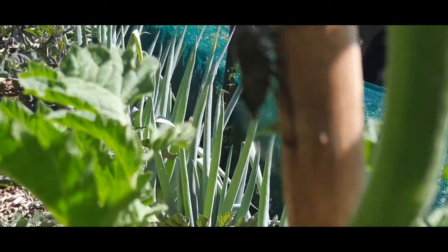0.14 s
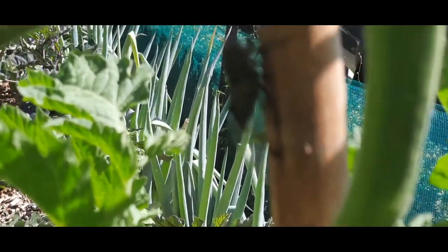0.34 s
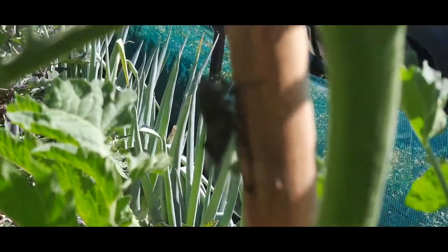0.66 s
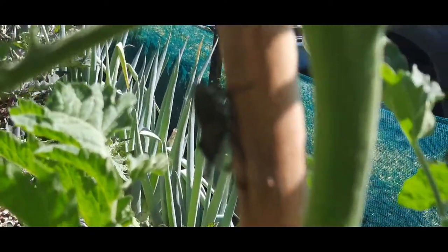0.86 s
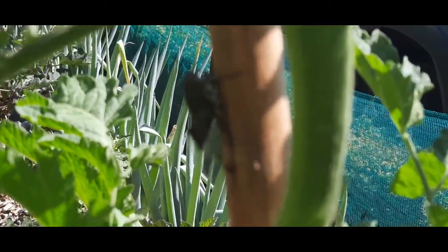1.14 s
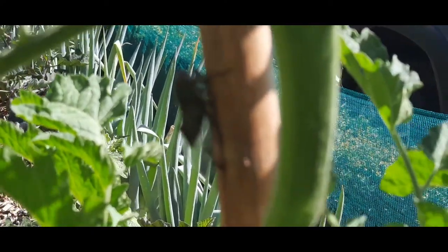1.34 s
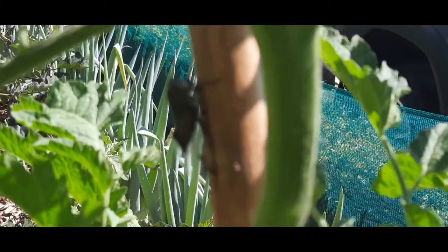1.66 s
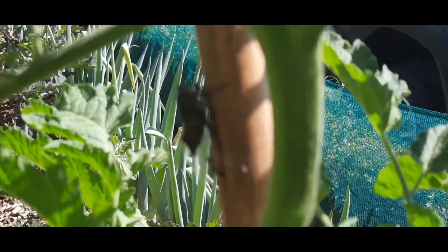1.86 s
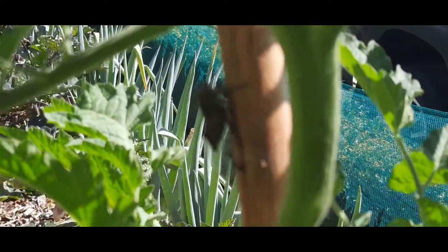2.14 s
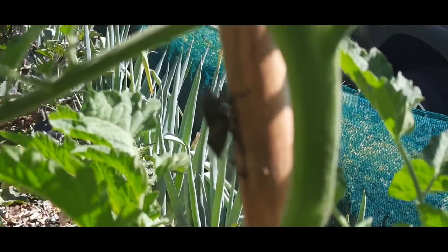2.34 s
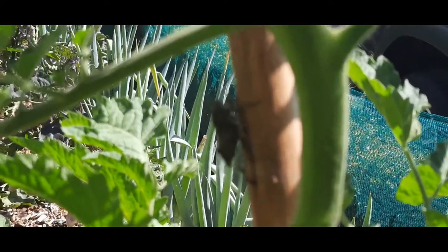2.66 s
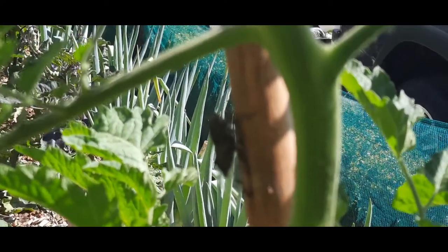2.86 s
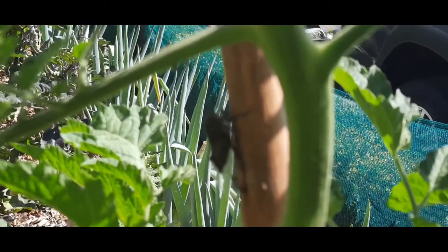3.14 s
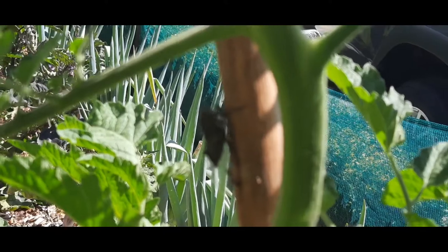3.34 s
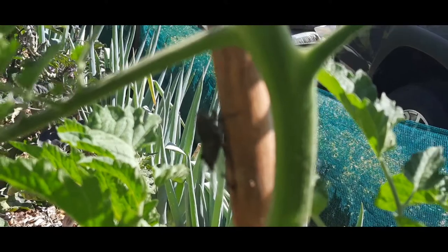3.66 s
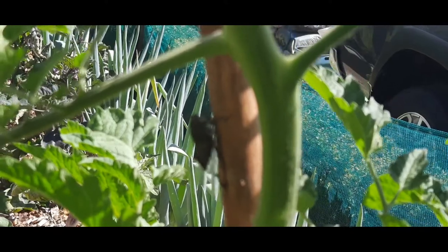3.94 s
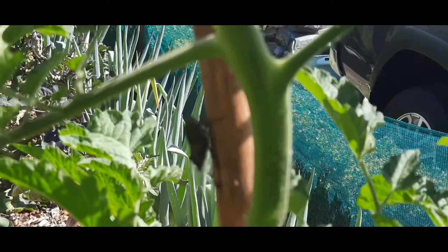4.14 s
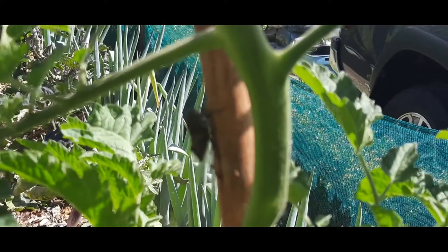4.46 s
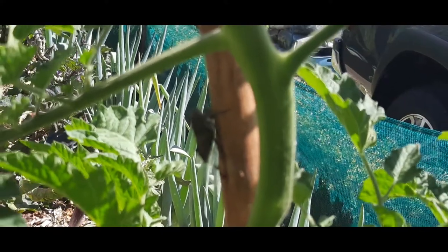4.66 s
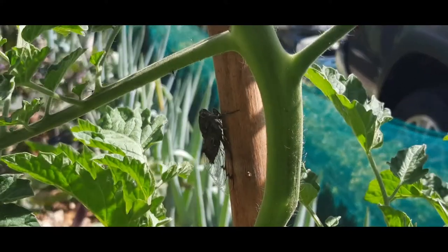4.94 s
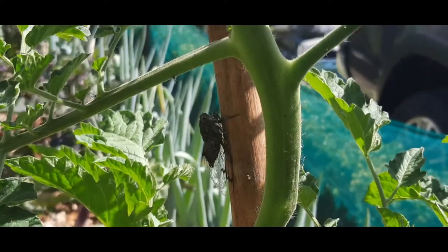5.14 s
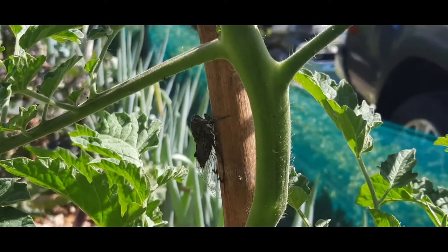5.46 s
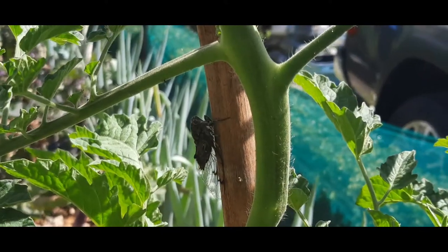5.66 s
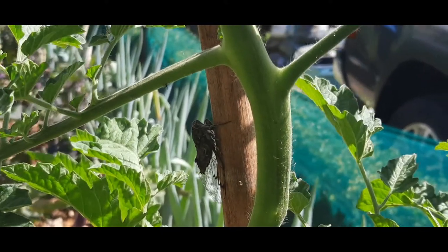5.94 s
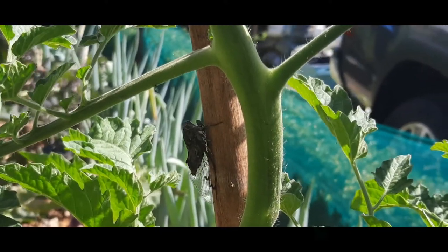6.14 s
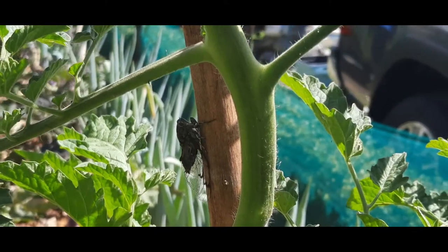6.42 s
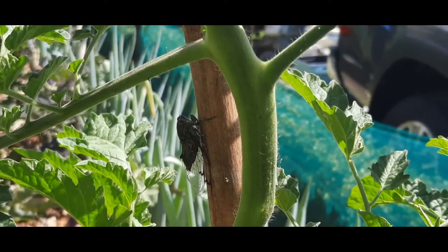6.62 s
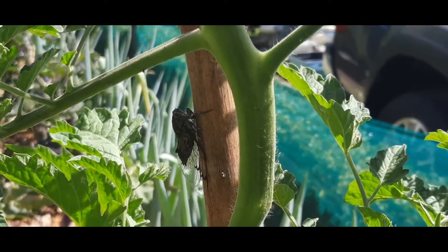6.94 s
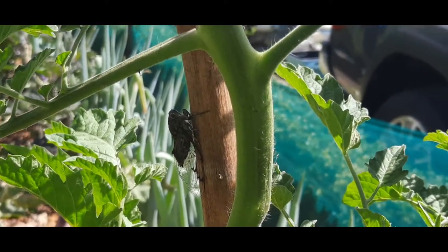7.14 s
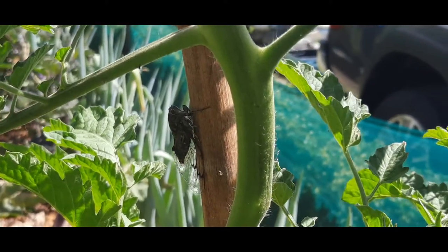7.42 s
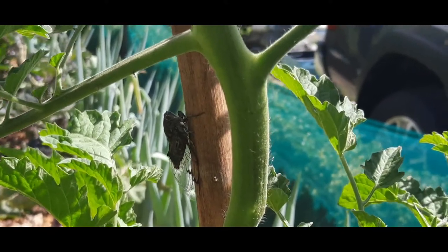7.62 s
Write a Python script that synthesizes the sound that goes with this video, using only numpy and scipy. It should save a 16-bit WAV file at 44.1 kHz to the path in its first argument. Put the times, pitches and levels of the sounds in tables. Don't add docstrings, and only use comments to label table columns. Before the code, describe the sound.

A cicada clinging to a garden stake is already singing, very near a handheld stereo microphone. From 0 to about 2 seconds it gives a coarse, pulsing rattle, some eighteen chirps a second, each a tiny burst of sharp clicks ringing bright and metallic around six to eight kilohertz. It swells early and stays strong, with a low fluttering push underneath. At about 2.1 it tightens into a quicker, finer buzz, around fifty pulses a second, quieter and slightly uneven, thinning until 4.5. The heavy throb then returns, loud and close, until 6.4, when a second fast buzz takes over, wavering and softening until the cut at 7.8. Leaves and ground add only a short, diffuse scatter. Faint garden air lies far below. Soft, low handling knocks come near 7.3, 7.6 and, barely, just before the end.

```python
import sys
import numpy as np
from scipy import signal
from scipy.fft import rfft, irfft
from scipy.io import wavfile

SR = 44100
rng = np.random.default_rng(int(sys.argv[2]) if len(sys.argv) > 2 else 0)


def wrap_up_sound(samples):
    columns = np.atleast_2d(samples).T
    tamed = np.clip(columns, -1, 1)
    steps = np.round(tamed * 32767).astype(np.int16)
    wavfile.write(sys.argv[1], SR, steps)


def gain_from_db(level_db):
    decades = np.asarray(level_db, float) / 20
    return 10 ** decades


N = 343539

# [t/ms in a long chirp, t/ms in a short chirp, left level/dB, right level/dB]
BUCKLES = [(1.05, .8, 0.5, -2), (2.15, 2.1, -3, -1.5), (4.05, 3.65, -1.5, -3), (5.1, 5.0, 0, -1.5),
           (7.2, 7.05, -3.5, -6)]
DIP_SHARES = [0.96, 0.17, 0.27, 0.25, 0.24]
# [t/ms, level/dB]
CONTRACTIONS = [(0, 0), (8.15, -1.5), (15.9, -3.5)]
# [t/s, chirps, gap change/ms, level/dB]
THROBS = [
    [(.011, 5, 0, -16.2), (.2974, 2, 0, -15.1), (.4155, 6, 0, -14.4), (.7631, 3, 0, -15),
     (.934, 6, .5, -15.5), (1.2798, 6, 0, -16), (1.6209, 3, -2.5, -16.6), (1.7909, 4, 0, -17),
     (2.0177, 1, 0, -17.4)],
    [(4.5005, 8, 1.7, -18.9), (4.9397, 4, 0, -15.6), (5.1647, 5, .8, -16), (5.4519, 7, 0, -16.2),
     (5.8512, 2, 0, -16.7), (5.9668, 7, 0, -16.4), (6.3642, 1, 0, -16.8)],
]
# [t/s, chirps, gap change/ms, level/dB]
FIRST_BUZZ = [(2.0729, 1, 0, -17.2), (2.1178, 5, -3, -19), (2.2624, 4, -5, -19.5), (2.3376, 3, 5, -19.8),
              (2.4104, 7, 0, -18.9), (2.5765, 6, -8, -18.8), (2.6681, 9, -2, -19.4), (2.7637, 3, 2, -18.6),
              (2.7992, 6, -6, -19.1), (2.9558, 4, 2.5, -19.7), (3.038, 25, 0, -19.3), (3.5193, 3, 3, -18.9),
              (3.5834, 21, 0, -19.5), (4.0071, 2, 0, -19), (4.0415, 10, .7, -18.8), (4.239, 10, 1.2, -18.7),
              (4.4528, 1, 0, -18.2), (4.4693, 1, 0, -19.2)]
SECOND_BUZZ = [(6.4198, 1, 0, -17.2), (6.4356, 3, 5, -18), (6.5143, 4, -1.5, -17.4), (6.6247, 5, 0, -17.6),
               (6.74, 6, -8, -17.6), (6.8225, 13, 0, -17.2), (6.9405, 9, 2.3, -18.2), (7.0343, 1, 0, -18.8),
               (7.0488, 4, 2.4, -18.8), (7.156, 8, -10, -20), (7.3079, 3, -1.5, -21),
               (7.3457, 14, -1.6, -21), (7.4966, 11, .6, -19.7), (7.6118, 9, 7, -20),
               (7.7383, 2, -3.5, -21), (7.782, 1, 0, -20)]


def click_times():
    rows = []
    for phrase in THROBS:
        for s, db in chirps(phrase, waver=.004):
            for gap_ms, fade_db in CONTRACTIONS:
                level_db = db + fade_db
                for (ms, _, left, right), share in zip(BUCKLES, DIP_SHARES):
                    dip_size = share * gain_from_db(2 * level_db)
                    rows.append((s + (gap_ms + ms) / 1000, level_db + left, level_db + right, dip_size, 8.5))
    for phrase in (FIRST_BUZZ, SECOND_BUZZ):
        for s, db in chirps(phrase, waver=.025):
            for (_, ms, left, right), share in zip(BUCKLES, DIP_SHARES):
                rows.append((s + ms / 1000, db + left, db + right, share * gain_from_db(2 * db), 0))
    return np.transpose(rows)


def chirps(runs, waver):
    start, count, change_ms, db = np.transpose(runs)
    s = [start[-1]]
    for a, b, n, change in zip(start, start[1:], count.astype(int), change_ms):
        gaps = (b - a) / n + change / 1000 * np.linspace(-.5, .5, n)
        s += list(a + np.cumsum(gaps) - gaps)
    s = np.sort(s)
    chance = rng.standard_normal((len(s), 2))
    wavering_s = s + waver * np.gradient(s) * chance[:, 0]
    effort_db = np.interp(s, start, db) + .4 * chance[:, 1]
    return np.transpose([wavering_s, effort_db])


# [f/Hz, width/Hz, level/dB]
BODY = [(5533, 1270, -10.5), (6053, 640, -5), (7120, 653, 2), (8325, 905, -0.5), (10224, 197, -6),
        (11080, 1090, -11), (14030, 1200, -27.5)]


def tymbals(clicks, jitter_ms, uneven_db, colour_db):
    s, *level_db = clicks[:3]
    s = s + jitter_ms / 1000 * rng.standard_normal(len(s))
    modes = len(BODY)
    strength = rng.standard_normal(len(s))
    shared, opposed = rng.standard_normal((2, modes, len(s)))
    near_db, lift_db, pan_db, _ = stance(s)
    high_db = -10.5 - 0.98 * near_db
    lag_ms = .119 + .003 * pan_db
    out = np.zeros((2, N))
    for k, (hz, width, db) in enumerate(BODY):
        posture_db, scatter_ms = 0, 0
        if hz < 6450:
            posture_db = lift_db + 11.5
        elif hz > 9300:
            posture_db = high_db + 10.0
            scatter_ms = 0.027 * opposed[k]
        for c, side in enumerate((1, -1)):
            own_db = uneven_db * strength + colour_db * (shared[k] + 1.48 * opposed[k] * side)
            place_db = near_db + side * (pan_db - .8) / 2
            size = gain_from_db(level_db[c] + db + posture_db + place_db + own_db + 29.5)
            strikes = impulses(s + c * (lag_ms + scatter_ms) / 1000, size)
            out[c] += (-1) ** k * resonance(strikes + 1e-18, hz, width)
    return butter(out, "high", 4950, order=10)


# [t/s, nearness level/dB, abdomen lift/dB, left-right level/dB, low dip level/dB]
STANCE = [(0, -2, -12.5, -2.5, -0.5), (.35, -0.45, -10.5, -1.9, -3), (.8, .5, -8, 0, -3.5),
          (1.5, 1, -8.5, -0.2, -2.5), (2.0, -0.3, -7, -0.4, 4), (2.5, -2.3, -6.5, 0, 2),
          (2.8, -3, -3.5, -1.2, 1), (3.0, -3.5, -2, -2.3, -12), (3.6, -3.5, -2, 0, -17),
          (4.2, -3, -3.5, 1.4, -12), (4.6, -2.06, -1, 0.3, -9), (5.0, 0.23, -5.5, -1.6, -0.5),
          (5.5, 0.35, -6.5, -2.5, 0), (6.35, 0, -6.5, -0.5, 2), (6.9, -1.1, -8, 1.6, 6),
          (7.2, -1.5, -3, .9, 5), (7.5, -1, -6, 2, 4.5), (7.79, -2, -1.5, 2, -6)]


def stance(s):
    at, *columns = np.transpose(STANCE)
    return [np.interp(s, at, c) for c in columns]


def foliage(x, near_db, near_t60, far_db, far_t60, dull_hz, count):
    t = np.arange(round(.12 * SR)) / SR
    onset = np.clip(t / .0005, 0, 1)
    near = onset * gain_from_db(np.array(near_db)[:, None] - 60 * t / near_t60)
    far = onset * gain_from_db(far_db - 60 * t / far_t60)
    place = np.arange(N) / N * (count - 1)
    treble_gain = gain_from_db(np.array([[8.5], [6.0]]))
    out = np.zeros((2, N))
    for k in range(count):
        weight = np.cos(np.pi / 2 * np.clip(place - k, -1, 1))
        leaves, ground = rng.standard_normal((2, 2, len(t)))
        leaves = leaves + treble_gain * butter(leaves, "high", 10100, order=4)
        echoes = near * leaves + far * butter(ground, "low", dull_hz, order=1)
        out += signal.oaconvolve(x * weight, echoes, axes=1)[:, :N]
    return out


def low_dips(clicks):
    s, _, _, size, extra_db = clicks
    dip_db = stance(s)[3]
    dip = butter(impulses(s, size * gain_from_db(dip_db + extra_db + 30.5)) + 1e-18, "low", 498, order=2)
    ring = resonance(impulses(s, size * gain_from_db(leak_db(s) + 48.5)) + 1e-18, 321, 51)
    left = dip + butter(ring, "low", 590, order=2)
    right = gain_from_db(-28.0) * butter(left, "high", 200, order=1)
    return -butter(np.array([left, right]), "high", 81, order=3)


def leak_db(s):
    start_db, end_db, settle_s = -3, -11.5, 1.28
    return end_db + (start_db - end_db) * np.exp(-s / settle_s) + stance(s)[0]


def rectified(x):
    square = butter(x, "high", 4650, order=2) ** 2 * gain_from_db(leak_db(np.arange(N) / SR))
    left = gain_from_db(4.5) * square[0] + gain_from_db(13.0) * butter(square[0], "low", 69, order=1)
    right = -gain_from_db(1.9) * butter(square[1], "high", 340, order=1)
    leak = butter(np.array([left, right]), "high", 54, order=3)
    return butter(leak, "low", 2780, order=2)


# [t/s, peak level/dB]
BUMPS = [
    (7.261, -42),
    (7.309, -35),
    (7.581, -39),
    (7.759, -45),
]


def handling():
    s, db = np.transpose(BUMPS)
    knocks = butter(impulses(s, gain_from_db(db + 52.5)), "low", 129, order=2)
    return resonance(knocks, 85, 40) * gain_from_db(np.array([[3.0], [-15.0]]))


# [f/Hz, level/dB per Hz]
GARDEN = [(40, -18), (120, -35), (400, -3), (1200, -13), (2500, -14), (4000, -16.5), (6000, 1),
          (15000, -36)]


def garden():
    hz = np.maximum(np.arange(N // 2 + 1) * SR / N, 1)
    at_hz, level_db = np.transpose(GARDEN)
    colour = gain_from_db(np.interp(np.log(hz), np.log(at_hz), level_db))
    noise = irfft(rfft(rng.standard_normal((2, N))) * colour, N)
    return gain_from_db(-52.5) * noise / noise.std() * gain_from_db(np.array([[3.0], [-3.0]]))


def butter(x, kind, hz, order):
    return signal.sosfilt(signal.butter(order, hz, kind, fs=SR, output="sos"), x)


def resonance(x, hz, width_hz):
    r = np.exp(-np.pi * width_hz / SR)
    poles = [1, -2 * r * np.cos(2 * np.pi * hz / SR), r * r]
    return signal.lfilter([(1 - r * r) / 2, 0, (r * r - 1) / 2], poles, x)


def impulses(s, size):
    out, taps = np.zeros(N + 2000), np.arange(-6, 7)
    whole = np.round(s * SR).astype(int)
    offset = taps - (s * SR - whole)[:, None]
    pulse = np.sinc(offset) * np.cos(np.pi * offset / 14) ** 2
    np.add.at(out, whole[:, None] + taps, size[:, None] * pulse)
    return out[:N]


def scene():
    clicks = click_times()
    song = tymbals(clicks, jitter_ms=.045, uneven_db=.7, colour_db=1.1)
    echoes = foliage(song, near_db=[-24.0, -21.5], near_t60=.013,
                     far_db=-28.0, far_t60=0.058, dull_hz=15300, count=9)
    return song + echoes + low_dips(clicks) + handling() + garden()


def low_pass(x):
    return signal.sosfilt(signal.butter(12, 16700, fs=SR, output="sos"), x)


def record(dry):
    rounded = np.tanh(dry + rectified(dry))
    mix = butter(rounded, "low", 15300, order=8)
    return low_pass(mix)


dry = scene()
out = record(dry)
wrap_up_sound(out)
```